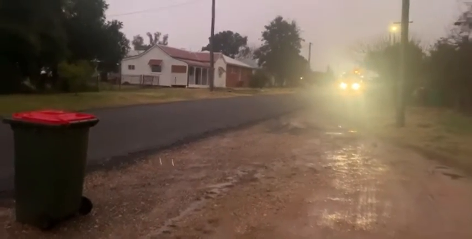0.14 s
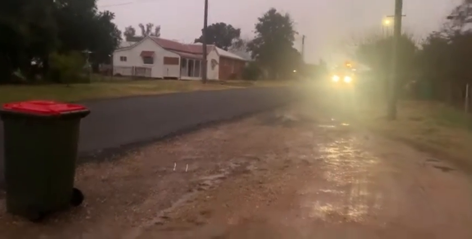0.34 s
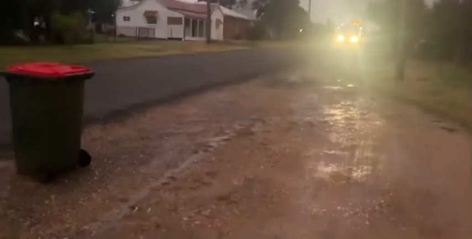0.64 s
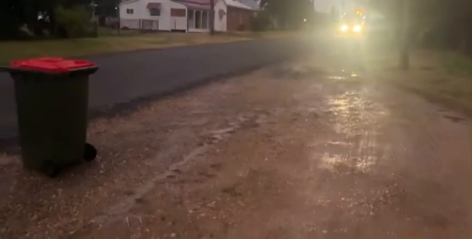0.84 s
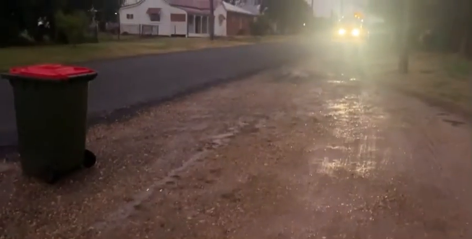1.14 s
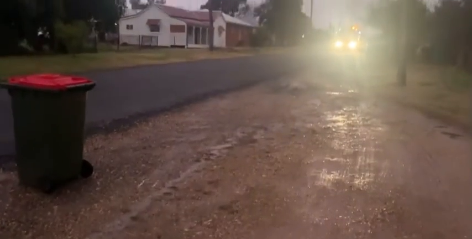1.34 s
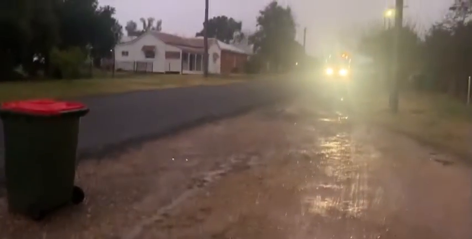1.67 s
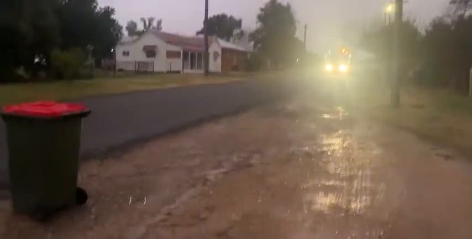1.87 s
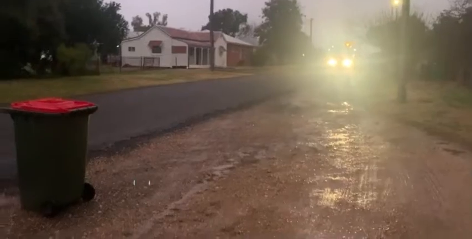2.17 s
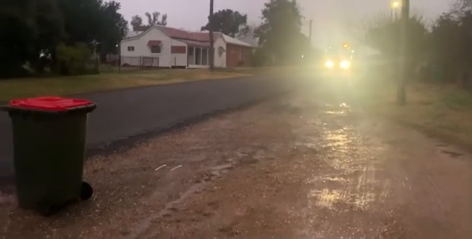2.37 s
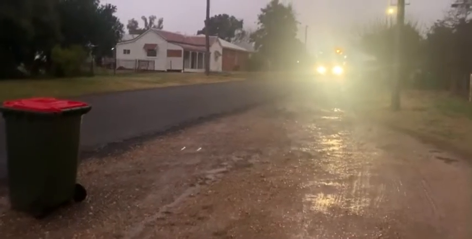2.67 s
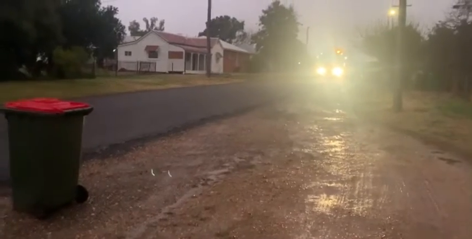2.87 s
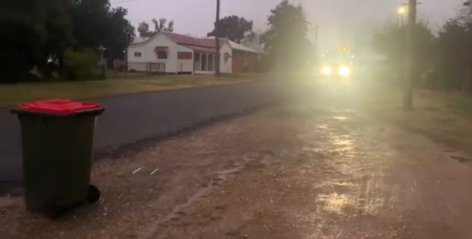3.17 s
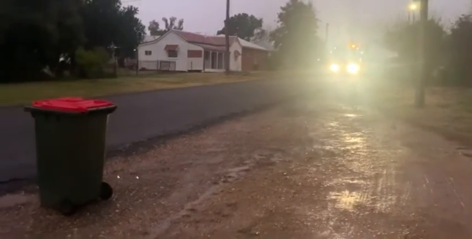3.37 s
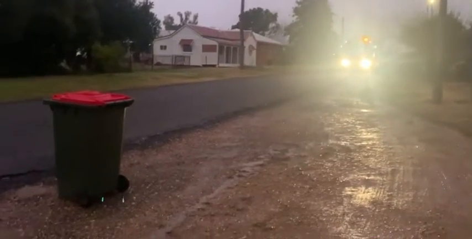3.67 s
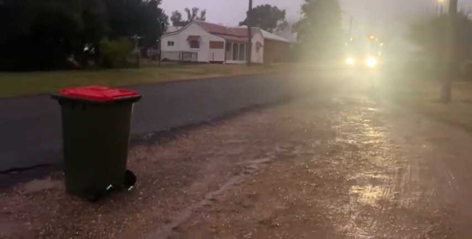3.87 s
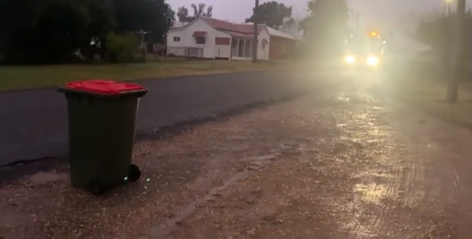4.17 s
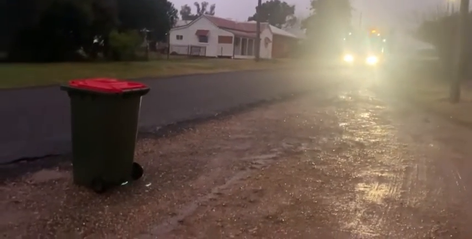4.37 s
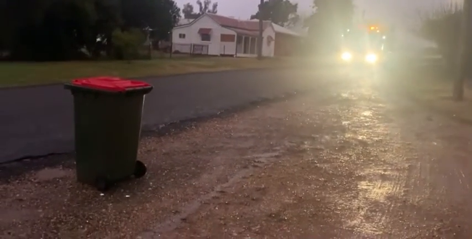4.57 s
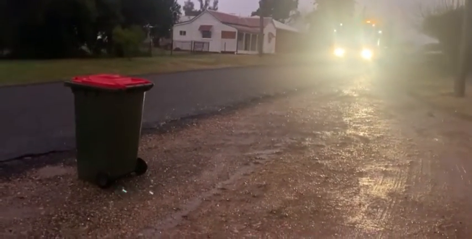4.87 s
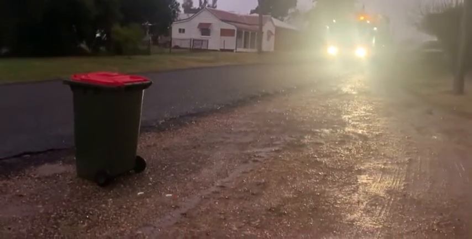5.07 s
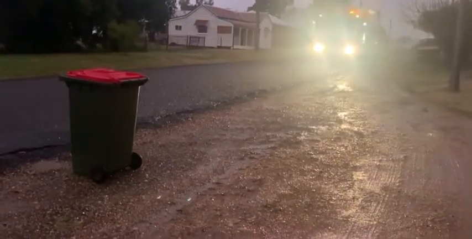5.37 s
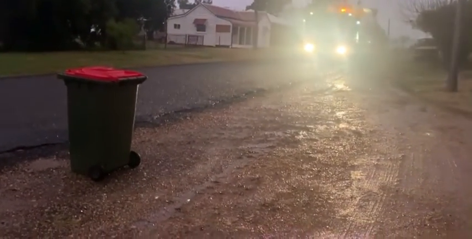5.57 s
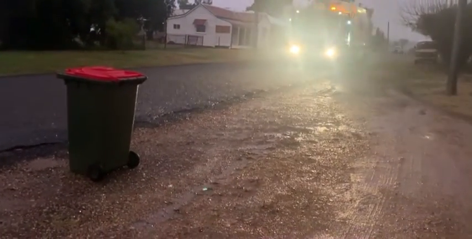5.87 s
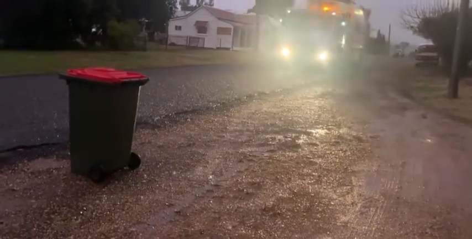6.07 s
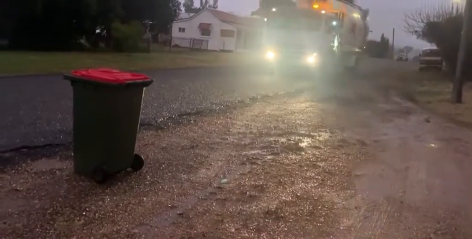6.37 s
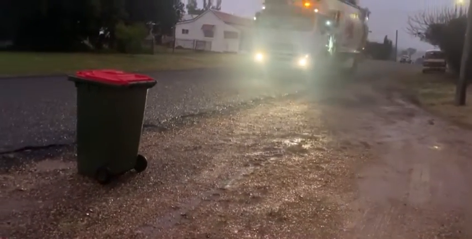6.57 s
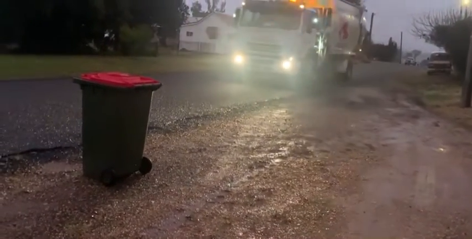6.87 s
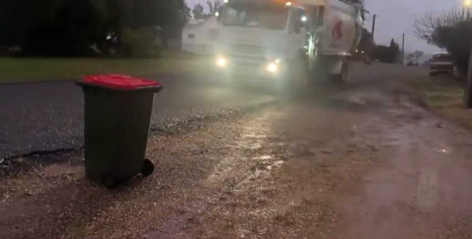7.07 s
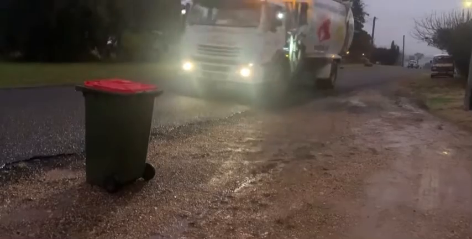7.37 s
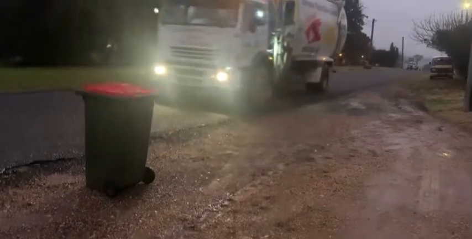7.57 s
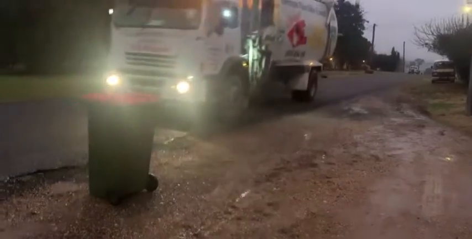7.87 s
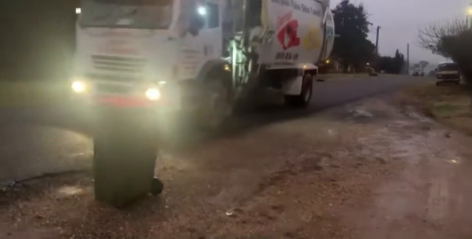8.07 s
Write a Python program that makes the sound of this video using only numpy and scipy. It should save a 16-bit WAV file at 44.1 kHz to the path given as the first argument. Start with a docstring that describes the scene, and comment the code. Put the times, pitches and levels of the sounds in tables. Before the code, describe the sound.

A diesel garbage truck booms up a wet street, shifts, lifts off, then slows close by with squealing brakes and gravel crunching.

```python
"""A six-cylinder diesel refuse truck comes down a wet street toward a hand-held phone with two microphone ports.
It pulls away, exhaust booming at the firing rate over low rumble, tyre roar and hiss, and shifts up at 2.2 s.
A drip plops close by; the boom throbs after the shift, then drops as the driver lifts off at 4.3 s.
Slowing, the truck nears: gears whine over a faint turbo, bumps thump, gravel crunches and brake drums squeal.
Sines make the pitched sounds, coloured noise the roar; the left port has its own colour, phase and timing."""
import sys
import numpy as np
from scipy import signal
from scipy.fft import rfft, irfft, next_fast_len
from scipy.io import wavfile
from scipy.ndimage import uniform_filter1d, map_coordinates

SR = 44100
rng = np.random.default_rng(int(sys.argv[2]) if len(sys.argv) > 2 else 0)


def transcribe(signal):
    """Save signal, clipped to [-1, 1], as a 16-bit WAV file at the path in sys.argv[1]."""
    frames = np.atleast_2d(signal).T
    limited = np.clip(frames, -1, 1)
    pcm = np.round(limited * 32767).astype(np.int16)
    wavfile.write(sys.argv[1], SR, pcm)


def ratio(d):
    """dB to gain"""
    e = np.asarray(d, float) / 20
    return 10 ** e


N = 362061
TIME = np.arange(N) / SR
SIZE = next_fast_len(N)
FREQ = np.maximum(np.fft.rfftfreq(SIZE, 1 / SR), 1)

# the engine pulls away, shifts up, lifts off, slows: time_s, firing_rate_hz, exhaust_boom_db
ENGINE = [(0.0, 90.1, -27.5), (0.3, 96.9, -32.5), (1.0, 103.4, -31.5), (1.3, 101.2, -29.5),
          (1.6, 95.5, -31), (1.8, 94.1, -27), (2.08, 92.6, -32.5), (2.22, 86, -30), (2.33, 81.53, -20),
          (2.47, 73.74, -25.5), (2.8, 73.3, -21), (3.1, 75.57, -21), (3.7, 77.5, -22.5), (4.22, 78.35, -27),
          (4.42, 78.54, -41.5), (4.9, 78.1, -37.5), (5.2, 76.72, -34), (5.8, 73.74, -30), (6.1, 71.24, -26),
          (6.7, 64.67, -29.5), (7.2, 58.83, -27), (7.6, 52.73, -37.5), (7.8, 50.47, -38),
          (8.05, 49.3, -37.5), (8.21, 50, -24)]
# noise of the approaching truck: time_s, thud_db, rumble_db, roar_db, hiss_db, roar_tilt_db_per_octave
ROAD = [(0.0, -49, -44.5, -44, -61, -2), (0.8, -44, -45.5, -40.5, -61, -3),
        (2.2, -52, -44, -42, -60.5, -2.5), (3.4, -48, -41, -40.5, -60, -2),
        (3.9, -47, -41, -39.5, -60.5, -0.5), (4.6, -40.5, -37, -40, -61, -1.1),
        (5.8, -38.5, -36.5, -38, -55, -0.3), (6.15, -34.5, -32, -36.5, -53.5, -0.6),
        (6.45, -34.5, -36.5, -36, -53, -0.6), (6.9, -34.5, -33.5, -36, -51.5, -1),
        (7.43, -34, -33, -34, -49.5, -0.5), (7.7, -36.5, -34, -34.5, -49.5, -1),
        (8.21, -40.5, -35.5, -33, -49, -1.5)]


def curve(rows, column=1, t=TIME):
    """One column of a table, interpolated at every t (seconds, or whatever the first column holds)."""
    rows = np.array(rows, float)
    return np.interp(t, rows[:, 0], rows[:, column])


def over_hz(rows, column=1):
    """One column of a frequency table, interpolated over log frequency at every bin."""
    rows = np.array(rows, float)
    return np.interp(np.log(FREQ), np.log(rows[:, 0]), rows[:, column])


def unit(x):
    """Scale to rms 1."""
    return x / np.sqrt(np.mean(x ** 2))


def walk(rate, size=N):
    """Random levels, each held for 1 / rate seconds, then slewed smooth; spread about 1."""
    hold = max(int(SR / rate), 2)
    wander = np.repeat(rng.standard_normal(size // hold + 1), hold)
    for span in (hold, hold, hold // 2):
        wander = uniform_filter1d(wander, span)
    return 1.4 * wander[:size]


def noise(colour, flicker_db, rate, tilt_db=0):
    """Coloured noise in overlapping octave bands, each flickering on its own; the tilt turns about the middle."""
    spectrum = rfft(rng.standard_normal(SIZE)) * ratio(over_hz(colour))
    octave = np.log2(FREQ / colour[0][0])
    count = int(np.log2(colour[-1][0] / colour[0][0])) + 2
    out = 0
    for k in range(count):
        band = np.cos(np.pi / 2 * np.clip(octave - k, -1, 1)) ** 2
        gain = ratio(flicker_db * walk(rate) + tilt_db * (k - count / 2))
        out = out + irfft(spectrum * band, SIZE)[:N] * gain
    return out / np.std(irfft(spectrum, SIZE))


def tone(rows, wander_hz, rate, rough, width_hz, fade_s, flicker_db=0):
    """A line following its (s, Hz, dB) rows, wandering in pitch and level, partly spread into narrow noise."""
    span = slice(int(rows[0][0] * SR), int(rows[-1][0] * SR))
    t = TIME[span]
    hz = curve(rows, t=t) + wander_hz * walk(rate, size=len(t))
    rough = np.clip(rough, 0, 1)
    spread = walk(width_hz, size=len(t)) + 1j * walk(width_hz, size=len(t))
    swing = np.sqrt(1 - rough) + np.sqrt(rough / 2) * spread
    fade = np.clip(np.minimum(t - t[0], rows[-1][0] - t) / fade_s, 0, 1)
    db = curve(rows, column=2, t=t) + flicker_db * walk(rate, size=len(t))
    out = np.zeros(N)
    out[span] = fade * ratio(db) * (swing * np.exp(2j * np.pi * np.cumsum(hz) / SR)).real
    return np.sqrt(2) * out


def exhaust():
    """Boom at the firing rate and its multiples; in-between and higher multiples fade with the load."""
    # in-between and higher multiples of the firing rate: multiple_of_firing_rate, full_load_level_db
    multiples = [(1 / 2, -44), (2 / 3, -47), (4 / 3, -43), (3 / 2, -49), (5 / 3, -47), (7 / 3, -46),
                 (5 / 2, -52), (8 / 3, -53), (10 / 3, -54), (7 / 2, -55), (11 / 3, -56), (4, -55),
                 (9 / 2, -55), (14 / 3, -54), (5, -58), (6, -55)]
    # how hard the engine pulls: time_s, load_0_to_1
    load_rows = [(0, 0.64), (1, 0.7), (2.1, 0.8), (2.6, 0.1), (3.4, 0.31), (4.2, 0.04), (4.5, 0),
                 (8.21, 0.1)]
    # pitches the tail pipe favours in the second and third multiple: pitch_hz, level_db (strength is added)
    pipe = [(145, -41), (165, -42), (185, -39.5), (194, -42.5), (204, -33.5), (220, -38), (228, -41.5),
            (234, -46), (265, -47), (288, -41), (308, -46.5)]
    # strength of the second and third multiples, nearly gone from 4.35 s: time_s, strength_db
    pulse_strength = [(0, -2.5), (3.0, 0), (3.5, -11.5), (4.2, -9), (4.35, -46)]
    hz = curve(ENGINE)
    turn = 2 * np.pi * np.cumsum(hz * (1 + 0.00391 * walk(12))) / SR
    # after the upshift the boom throbs a few times
    throb_from_s, throb_to_s, throb_period_s, throb_fade_s = 2.99, 3.8, 0.33, 0.18
    throbbing = np.minimum(TIME - throb_from_s + throb_fade_s, throb_to_s - TIME) / throb_fade_s
    throb = np.cos(2 * np.pi * (TIME - throb_from_s) / throb_period_s)
    throb_db = 2 * np.clip(throbbing, 0, 1) * throb
    # off load the boom is less steady
    load = curve(load_rows)
    coasting = np.clip(1 - load / 0.37, 0, 1)
    unsteady_db = 0.53 * walk(25) + 0.5 * coasting * walk(6.5)
    out = ratio(curve(ENGINE, column=2) + throb_db + unsteady_db) * np.sin(turn)
    for k in (1, 2):
        pulse_db = curve(pipe, t=(k + 1) * hz) + curve(pulse_strength) + 1.38 * walk(11)
        out += ratio(pulse_db) * np.sin((k + 1) * turn - k)
    load = np.clip(load, 0, 1)
    upper = load ** 0.3  # multiples above the third fade less with the load
    for order, db in multiples:
        strength = (load if order < 3 else upper) * ratio(db + 1.5 * walk(4))
        out += strength * np.sin(order * turn + 2 * np.pi * rng.random())
    return np.sqrt(2) * out


def clatter():
    """Engine clatter rings in the cab's shell; one cylinder knocks harder, once in six firings."""
    # ringing of the shell: time_s, pitch_hz, level_db
    shell = [(0.0, 1071, -49), (2.1, 1070, -45), (2.9, 1090, -62), (3.1, 1084, -49), (3.9, 1075, -40.5),
             (4.35, 1069, -48), (4.6, 1074, -46), (6.1, 1015, -48.5), (6.4, 1053, -56), (7.2, 1072, -44.5),
             (7.6, 1082, -47.5), (7.9, 1080, -41), (8.03, 1096, -43.5), (8.21, 1090, -47)]
    # the knock grows clearer as the truck nears: time_s, depth_db
    knock_depth = [(0, 1), (5.8, 2), (6.2, 6), (7.2, 9), (8.21, 12)]
    ringing = tone(shell, wander_hz=11.87, rate=13, rough=0.56, width_hz=220, fade_s=0.011, flicker_db=1.5)
    cycle = np.cumsum(curve(ENGINE)) / SR / 6
    knock_cycle = cycle - np.interp(7.91, TIME, cycle)  # a knock falls at 7.91 s
    return ringing * ratio(curve(knock_depth) * np.cos(2 * np.pi * knock_cycle))


def rumble():
    """Gusty thud and rumble of body and exhaust, as two bands of low noise."""
    # colours of the thud and of the rumble: frequency_hz, density_db_per_hz
    thud_colour = [(18, -24.5), (30, -20.5), (45, -0.5), (65, 5), (95, -3), (130, -13.5), (180, -40)]
    rumble_colour = [(60, -7.5), (100, 3), (140, 1.5), (220, -1), (320, -10), (500, -23.5)]
    thud = ratio(curve(ROAD, column=1)) * noise(thud_colour, flicker_db=1.5, rate=9.7)
    return thud + ratio(curve(ROAD, column=2)) * noise(rumble_colour, flicker_db=2.0, rate=12)


def road():
    """Roar of engine and tyres, puffing once a firing, under wet hiss in two bands."""
    # colours of the roar, the hiss and the topmost hiss: frequency_hz, density_db_per_hz
    roar_colour = [(200, -7.5), (320, -8.5), (400, -6.5), (560, -0.5), (680, -4), (770, 4), (880, -11),
                   (1000, 2), (1150, -1.5), (1330, -10.5), (1550, -7), (2400, -11), (3000, -17),
                   (4000, -34.5), (6300, -71.5)]
    hiss_colour = [(2200, -31), (3000, -5), (4300, -1), (5100, -4), (5500, -11), (6300, -8), (7000, -13),
                   (7400, -22), (8300, -20), (9000, -21), (9600, -25), (9800, -70), (13000, -90)]
    top_colour = [(9400, -30), (9700, 0), (10400, -3), (10900, -8), (11100, -40)]
    # level of the topmost hiss, faint, silent from 6.52 s: time_s, level_db
    top_level = [(0, -84), (2, -83), (3.3, -83), (4.2, -86), (5.5, -84), (6.4, -79), (6.52, -120),
                 (8.21, -120)]
    firing = np.cos(2 * np.pi * np.cumsum(curve(ENGINE)) / SR)
    puffs_db = 1.2 * (1 + 0.5 * walk(30)) * firing
    roar = noise(roar_colour, flicker_db=1.0, rate=18, tilt_db=curve(ROAD, column=5))
    roar = ratio(curve(ROAD, column=3) + puffs_db) * roar
    top_hiss = ratio(curve(top_level)) * noise(top_colour, flicker_db=-0.5, rate=16)
    hiss = ratio(curve(ROAD, column=4)) * noise(hiss_colour, flicker_db=0.9, rate=18)
    return roar + top_hiss + hiss


def drifting_bands():
    """Broad bands of the roar that drift in pitch as the truck nears."""
    # one list for each band: time_s, centre_hz, level_db
    drifts = [
        [(0, 2654, -58.5), (1, 2590, -58.5), (2.1, 2456, -59), (2.6, 2270, -70)],
        [(2.2, 1746, -60.5), (3, 1850, -54), (3.8, 1898, -52), (4.6, 1954, -54.5), (5.4, 1949, -54)],
        [(0, 4040, -71), (1, 4040, -62.5), (2.2, 4020, -65.5), (3.4, 3960, -63), (3.9, 4013, -73)],
        [(6.2, 1748, -50), (6.8, 1708, -50), (7.2, 1590, -49), (7.6, 1515, -48), (8.21, 1566, -49)],
        [(6, 2554, -62), (6.8, 2500, -53), (7.5, 2440, -53.5), (8.21, 2400, -54)],
    ]
    return sum(tone(rows, wander_hz=40, rate=6, rough=0.93, width_hz=700, fade_s=0.1, flicker_db=2)
               for rows in drifts)


def streaks():
    """Brief, slightly falling tones scattered at random through the roar, weaker toward the treble."""
    out, t = np.zeros(N), TIME[:int(0.12 * SR)]
    for when, pitch, glide in rng.random((240, 3)):
        octaves = 2.9 * pitch
        hz = 450 * 2 ** octaves
        start = int(when * (N - len(t)))
        falling = np.sin(2 * np.pi * hz * t * (1 - 0.1 * glide * t))
        out[start:start + len(t)] += ratio(-2 * octaves) * np.hanning(len(t)) * falling
    return np.sqrt(2) * ratio(curve(ROAD, column=3) - 15) * out  # 15 dB under the roar's level


def whines():
    """Thin lines of turbo and gears, and a steady hum of the body while the engine pulls."""
    # two turbo whistles running down: time_s, pitch_hz, level_db
    turbo = [
        [(2.0, 11000, -80), (2.35, 10880, -79), (2.7, 10520, -80), (3.25, 10150, -80), (3.5, 9400, -77),
         (4, 7740, -78), (4.3, 6900, -80), (4.7, 6130, -86)],
        [(4.35, 9600, -82), (4.7, 8750, -80), (5.05, 8180, -77), (5.4, 7746, -74), (5.75, 7455, -78)],
    ]
    # gear whines, most sliding down, a few up: start_s, length_s, first_hz, last_hz, level_db
    gear_slides = [(5.45, 0.71, 2010, 1700, -53), (5.5, 0.63, 796, 763, -44), (5.95, 0.84, 505, 414, -50),
                   (6.2, 0.73, 763, 681, -47), (6.5, 1.116, 530.5, 462.7, -45.5),
                   (6.8, 0.75, 822, 722, -41), (7.15, .5, 1640, 1460, -45), (7.9, 0.493, 1095, 1125, -42),
                   (4.95, .75, 1095, 1050, -53), (4.85, 0.707, 1020, 910, -48.5), (5.75, .5, 950, 990, -44),
                   (6.72, .3, 1300, 1070, -49), (7.72, 0.39, 545, 570, -48), (7.4, 0.41, 790, 630, -52)]
    # hum of the body: time_s, pitch_hz, level_db
    hum = [(0, 565, -56), (.5, 575, -54), (1.1, 565, -54), (1.9, 562, -51), (2.3, 565, -56), (3, 572, -53),
           (3.6, 578, -55), (4, 575, -60)]
    lines = [[(s, first_hz, db), (s + length, last_hz, db)] for s, length, first_hz, last_hz, db in gear_slides]
    lines.append(hum)
    whistles = sum(tone(rows, wander_hz=35, rate=25, rough=0.85, width_hz=220, fade_s=0.1, flicker_db=2)
                   for rows in turbo)
    return whistles + sum(tone(rows, wander_hz=2.5, rate=12, rough=0.12, width_hz=30, fade_s=0.1, flicker_db=1.3)
                          for rows in lines)


def brakes():
    """Stick-slip locks onto drum modes: each catch sags and fades, unsteady in pitch, rough in level."""
    # drum modes that catch and let go: start_s, length_s, pitch_hz, level_db
    squeals = [(5.85, .13, 10100, -71), (6.118, 0.14, 10300, -65.5), (6.223, 0.11, 7875, -60),
               (6.496, 0.081, 9300, -42.5), (6.571, 0.13, 9130, -52), (6.642, 0.06, 9510, -55),
               (6.758, 0.19, 9380, -41.5), (6.78, 0.11, 8600, -57), (6.83, 0.18, 7800, -56.5),
               (6.942, 0.12, 9270, -36.5), (7.037, 0.18, 8546, -59), (7.061, 0.062, 8930, -45.5),
               (7.13, 0.059, 9520, -52), (7.205, .03, 10800, -60), (7.238, 0.039, 11260, -51),
               (7.27, 0.036, 10800, -63), (7.241, 0.2, 9340, -38.5), (7.247, .15, 8600, -56),
               (7.36, 0.055, 10800, -57), (7.371, .21, 8240, -45), (7.428, 0.15, 9280, -33),
               (7.537, 0.2, 8830, -47.5), (7.61, 0.14, 9100, -60), (7.704, 0.047, 9500, -42.5),
               (7.761, 0.12, 9290, -32.5), (7.763, 0.066, 7640, -51), (7.765, .21, 10780, -47.5),
               (7.816, 0.31, 8790, -49.5), (7.881, 0.38, 9100, -47), (7.966, 0.056, 10900, -62),
               (7.981, 0.11, 8600, -39), (8.061, 0.079, 11740, -48), (8.083, 0.073, 8800, -41),
               (8.117, 0.077, 11740, -45), (8.166, 0.052, 8660, -43), (8.183, .04, 9060, -35.5)]
    # a rough screech runs under the squeals: frequency_hz, density_db_per_hz
    screech_colour = [(7000, -26), (7600, -13), (8300, -9), (8800, -5), (9200, 0), (9550, -4), (9720, -40),
                      (10000, -80)]
    # varying loudness of that screech: time_s, level_db
    screech_level = [(6.46, -92.5), (6.5, -57), (6.7, -57.5), (6.74, -56), (6.8, -47), (7.05, -50),
                     (7.2, -58.5), (7.23, -61), (7.28, -48), (7.55, -42), (7.65, -53), (7.8, -51),
                     (7.95, -48), (8.02, -64), (8.1, -55), (8.21, -51)]
    edge_s, sag_hz_per_s, fade_db_per_s = 0.016, 250, 9
    out = ratio(curve(screech_level) + 3.8 * walk(45)) * noise(screech_colour, flicker_db=3.0, rate=39)
    for s, length, hz, db in squeals:
        rows = [(s - edge_s / 2, hz, db),
                (s + length + edge_s / 2, hz - sag_hz_per_s * length, db - fade_db_per_s * length)]
        squeal = tone(rows, wander_hz=24, rate=70, rough=0.28, width_hz=320, fade_s=edge_s, flicker_db=3.5)
        # the lining scrapes in a broad band around each mode
        scrape = tone(rows, wander_hz=89.8, rate=27, rough=0.94, width_hz=590, fade_s=2 * edge_s, flicker_db=6)
        out = out + squeal + ratio(-15) * scrape
    return out


def gravel():
    """Tyres cross loose gravel: bursts of dense grit, and single stones that ring for a few cycles at most."""
    # crunches of grit: start_s, length_s, level_db (before the envelope), centre_hz
    crunches = [(5.812, .02, -50, 3500), (6.105, .04, -46, 3700), (6.21, .015, -52, 3800),
                (6.405, .045, -39, 3400), (6.585, .035, -41, 2800), (6.895, .03, -38, 1800),
                (6.93, .04, -47, 4500), (7.065, .03, -38, 1500), (7.62, .02, -52, 6000),
                (7.71, .025, -49, 5600), (7.87, .04, -37, 1600), (7.31, .02, -47, 4200),
                (8.16, .04, -45, 4300)]
    # stones snapping out: start_s, level_db (before the envelope), pitch_hz
    stones = [(6.106, -29, 4200), (6.134, -25, 3900), (6.152, -30, 4000), (6.22, -30, 4200),
              (6.288, -17, 1810), (6.411, -20, 1890), (6.428, -26, 4000), (6.445, -24, 2300),
              (6.608, -18, 1800), (6.718, -22, 2200), (6.905, -13, 1300), (7.076, -13, 1500),
              (7.291, -19, 1500), (7.314, -21, 2000), (7.538, -18, 1900), (7.855, -19, 2200),
              (7.882, -16, 2000), (7.909, -19, 1400), (8.143, -21, 1800)]
    out = np.zeros(N)
    for s, length, db, hz in crunches:
        t = np.arange(int(3 * length * SR)) / SR
        grit = rng.standard_normal(len(t)) * ratio(3.5 * rng.exponential(size=len(t)))
        bandpass = signal.butter(3, [hz / 2.2, hz * 1.55], "band", fs=SR, output="sos")
        grit = unit(signal.sosfilt(bandpass, grit))
        burst = ratio(db) * grit * np.minimum(3 * t / length, 1) * np.exp(-(t / length) ** 2)
        start = int(s * SR)
        out[start:start + len(t)] += burst[:N - start]
    t = np.arange(SR // 100) / SR
    # smaller stones at random, denser as the wheels come near
    when, size, pitch = rng.random((90, 3)).T
    from_s = 5.6
    small_s = from_s + (TIME[-len(t)] - from_s) * np.sqrt(when)
    small = zip(small_s, -41 - 2.5 * np.log(size), 1500 * 4 ** pitch)
    snap = np.exp(-t / 0.0008) * np.minimum(t / 0.0004, 1) ** 2
    for s, db, hz in stones + list(small):
        out[int(s * SR):][:len(t)] += ratio(db) * np.sin(2 * np.pi * hz * t) * snap
    return out


def bumps():
    """The body thumps over bumps: each swells for a cycle and dies in a few more."""
    # thumps: start_s, level_db (before the envelope), pitch_hz
    thumps = [(4.79, -30.5, 190), (5.33, -29.5, 190), (6.05, -26, 203), (6.08, -22.5, 75), (6.479, -25, 90),
              (7.0, -27, 202), (7.149, -26.5, 65), (7.219, -25.5, 192.4), (7.295, -20, 65.5),
              (7.5, -28.5, 160), (7.615, -25, 65), (8.14, -20.5, 84.7)]
    out = np.zeros(N)
    for s, db, hz in thumps:
        start = int(s * SR)
        cycles = TIME[:min(SR // 5, N - start)] * hz
        envelope = np.minimum(cycles, 1) * np.exp(-(cycles / 3) ** 2)
        out[start:][:len(cycles)] += ratio(db) * np.sin(2 * np.pi * cycles) * envelope
    return out


def drip(late_s):
    """A drop on something hollow: a few cycles that swell, sag in pitch and die."""
    t = np.clip(TIME - 2.4259 - late_s, 0, 0.03)
    swell_s = 0.0017
    swell = t / swell_s * np.exp(1 - t / swell_s - (t / 0.0092) ** 4)
    return ratio(-12.5) * swell * np.cos(2 * np.pi * 718 * (t - 0.00117) * (1 - 5 * t))


def lead_left(truck):
    """Shifts the truck in time for the left port as it drifts to the left; the treble is not shifted."""
    # lead of the left port: time_s, earlier_by_ms
    lead = [(0, 0.0034), (4.5, -0.025), (6, -0.0035), (8.21, 0.1)]
    # above 3500 Hz the sound, spread over the wet road, keeps its direction
    lowpass = signal.butter(2, 3500, fs=SR, output="sos")
    body = signal.sosfiltfilt(lowpass, truck)
    places = np.arange(N) + curve(lead) * SR / 1000
    return truck - body + map_coordinates(body, [places], order=3, mode="nearest")


def left_port(x, scattered):
    """The left port's own colour and phase; it also gets scattered sound that the right one does not share."""
    # left microphone port against right: frequency_hz, level_db, phase_rad, shared_share_0_to_1
    ports = [(40, 0, -.4, .999), (110, 0, -.5, .999), (250, 0, -.66, .995), (420, .4, -1.05, .97),
             (620, 2, -2, .93), (780, -14, -3, .6), (870, -4, -3.3, .8), (1030, -11, -5.2, .75),
             (1300, -5, -6.5, .88), (2000, -.5, -6.75, .94), (2800, -2.5, -6.4, .8), (3500, -1, -6.6, .5),
             (4700, -6.5, -8.2, .55), (5400, -1, -9.3, .9), (6600, -3, -7, .5), (7300, 0, -3.2, .75),
             (8600, 0, -5.7, .9), (9250, 0, -6.3, .99), (9800, 0, -6.6, .99), (11000, 0, -9.2, .9)]
    share = np.clip(over_hz(ports, column=3), 0, 1)
    mix = share * rfft(x, SIZE) + np.sqrt(1 - share ** 2) * rfft(scattered, SIZE)
    response = ratio(over_hz(ports)) * np.exp(1j * over_hz(ports, column=2))
    return irfft(mix * response, SIZE)[:N]


def scene():
    """Right port straight; left port shifted and filtered, with the drip 0.29 ms later."""
    truck = (rumble() + road() + drifting_bands() + gravel() + bumps() + streaks()
             + whines() + clatter())
    tones = exhaust() + brakes()
    edge = np.clip(np.minimum(TIME, TIME[-1] - TIME) / 0.004, 0, 1)  # fades both ends before the filter
    left = left_port(edge * (lead_left(truck) + tones), road()) + drip(0.00029)
    right = truck + tones + drip(0)
    return np.array([left, right])


def band_limit(x):
    """A steep low-pass at the top of the band."""
    return signal.sosfilt(signal.butter(12, 12600, fs=SR, output="sos"), x)


def record(dry):
    """The two ports as the phone stores them."""
    return band_limit(dry)


dry = scene()
out = record(dry)
transcribe(out)
```